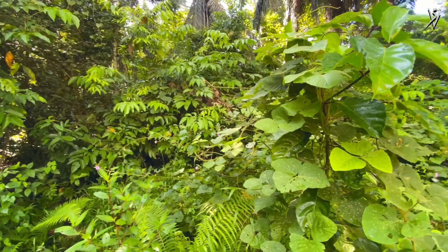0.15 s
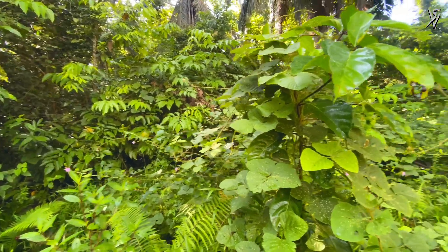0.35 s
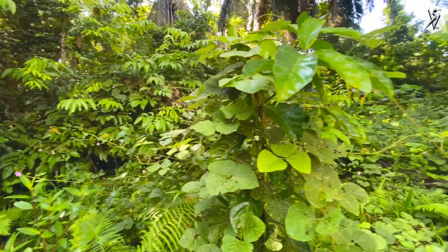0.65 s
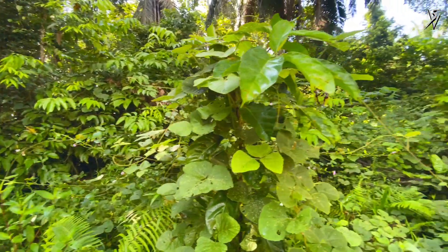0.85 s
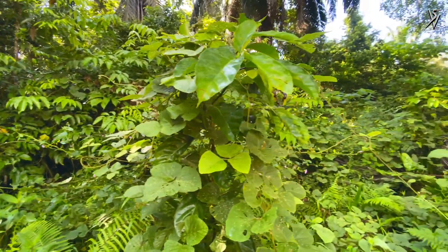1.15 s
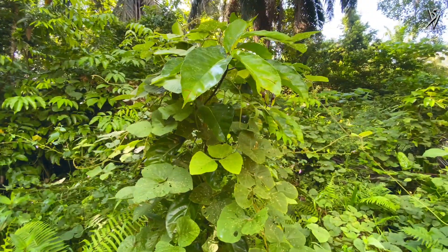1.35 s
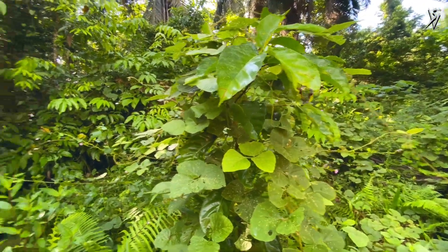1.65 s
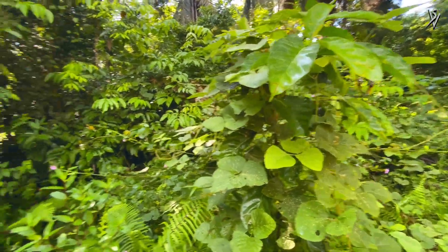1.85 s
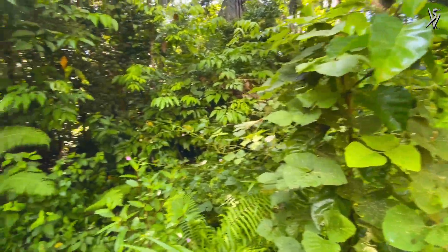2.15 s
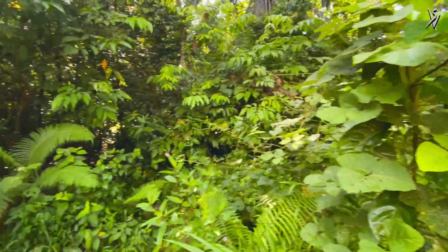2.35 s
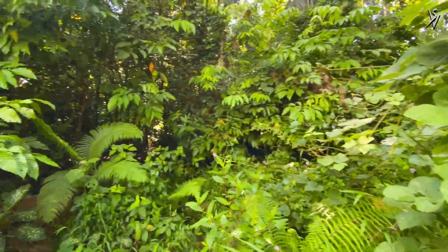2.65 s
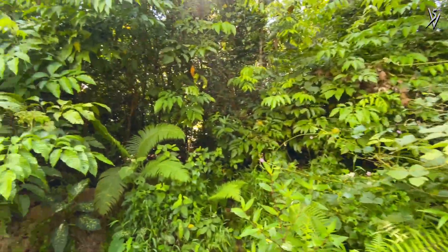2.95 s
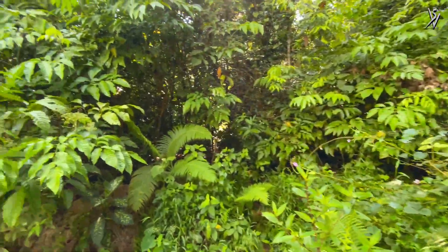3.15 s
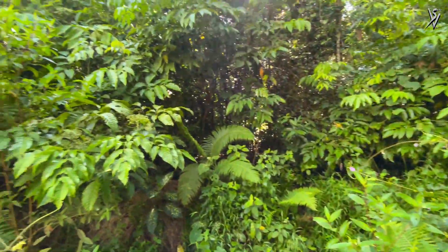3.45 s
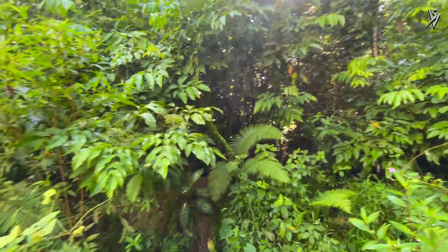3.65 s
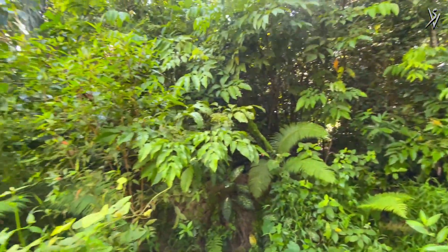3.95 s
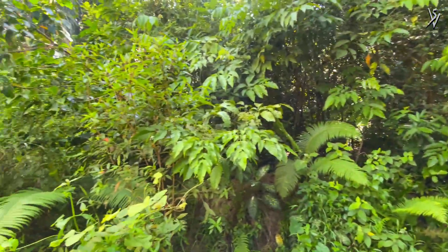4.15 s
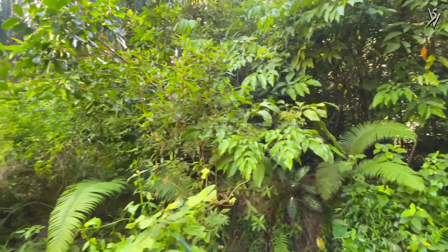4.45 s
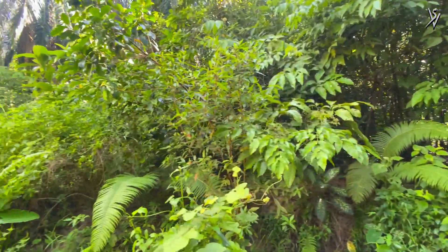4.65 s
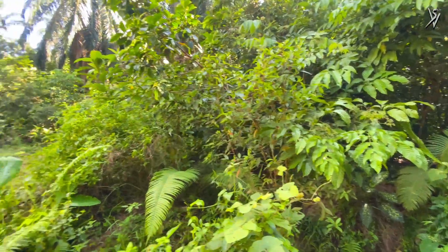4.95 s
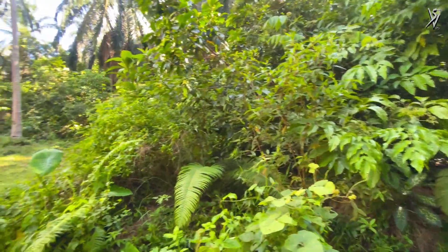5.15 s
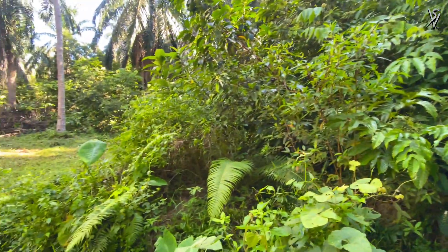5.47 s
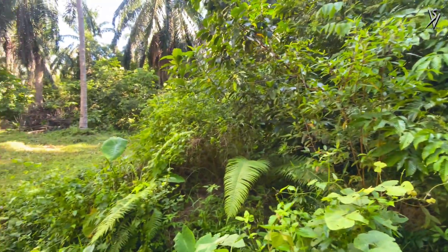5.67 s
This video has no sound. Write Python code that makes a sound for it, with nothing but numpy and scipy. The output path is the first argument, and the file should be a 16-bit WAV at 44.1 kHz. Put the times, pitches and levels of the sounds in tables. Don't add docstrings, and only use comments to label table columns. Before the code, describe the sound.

A steady, piercing insect chorus fills dense foliage throughout, in stereo from a handheld phone turning slowly. A near cricket at about 6.7 kHz chirps in tight triplets, some seventeen per second, so it reads as a rapid buzzing pulse; it starts softer, strengthens around 2.2 and 3.4 s, and keeps swelling and dipping and shifting sides. A further cricket trills higher during the first second, then in short phrases near 2.7, 3.3, 3.8, 4.9 and 5.6 s. Faint thin whistles around 3 kHz slide slowly down. Beneath lie low road rumble and distant engine hums near 50-60 Hz, wavering. The leaves are mostly calm until about 2.1 s, then rustle in light gusts, often from 3.2 s onward. Twigs tick faintly at 1.3 s, then more sharply at 2.4, 2.5, 3.8, 4.8, 5.0 and 5.6 s. A tiny bird slur drops quickly at 3.25 s.

```python
import sys
import numpy as np
from scipy import signal
from scipy.io import wavfile
from scipy.ndimage import uniform_filter1d

SR = 44100
rng = np.random.default_rng(int(sys.argv[2]) if len(sys.argv) > 2 else 0)


def pcm_store(signal):
    levels = np.round(np.clip(np.atleast_2d(signal), -1, 1) * 32767)
    wavfile.write(sys.argv[1], SR, levels.astype(np.int16).T)


def volts(x):
    e = np.asarray(x, float) / 20
    return 10 ** e


N = 256220
T = np.arange(N) / SR


def curve(table):
    s, *columns = np.transpose(table)
    return [np.interp(T, s, c) for c in columns]


def bumps(table):
    return sum(db * np.clip(1 - abs(T - s) / half_s, 0, 1) for s, half_s, db in table)


def phrases(table, fade_db_per_s):
    rise, fall = fade_db_per_s
    levels = []
    for start, end, db, *_ in table:
        levels.append(db - rise * np.maximum(start - T, 0) - fall * np.maximum(T - end, 0))
    return np.max(levels, axis=0)


def walk(rate, count=1):
    k = int(SR / rate)
    held = np.repeat(rng.standard_normal((count, N // k + 1)), k, 1)
    smooth = uniform_filter1d(uniform_filter1d(held, k), k)[:, :N]
    return smooth / smooth.std()


def pair(x, pan_db, turn=0.):
    left = (x * np.exp(.5j * turn)).real * volts(pan_db / 2)
    right = (x * np.exp(-.5j * turn)).real * volts(-pan_db / 2)
    return np.array([left, right])


def air(spectrum, flicker_db, grain_db=0.):
    grains = volts(grain_db * np.minimum(rng.exponential(size=N), 5))
    noise = rng.standard_normal((2, N)) * grains / np.sqrt(np.mean(grains ** 2))
    hz, _, z = signal.stft(noise, SR, nperseg=2048)
    f, mid_db, side_db, pan_db = np.transpose(spectrum)

    def colour(column, above_db):
        return np.interp(np.log(hz + 1), np.log(f), column, left=-150, right=above_db)[:, None]

    mid, side = volts(colour(mid_db, -150)), volts(colour(side_db, -150))
    pan = np.clip(colour(pan_db, 0), -6, 6)
    patch = rng.standard_normal(z.shape[1:])
    patch = uniform_filter1d(uniform_filter1d(patch, size=24, axis=0), size=4, axis=1)
    z = z * volts(flicker_db * patch / patch.std() + 10 * np.log10(SR / 2))
    m, s = z[0] * mid, z[1] * side
    both = np.array([(m + s) * volts(pan / 2), (m - s) * volts(-pan / 2)])
    return signal.istft(both, SR, nperseg=2048)[1][:, :N]


def strokes(times, hz, db, length_ms, glide, rise, scatter_db, detune):
    out = np.zeros(N + SR, complex)
    u = np.arange(int(length_ms * SR / 1000)) / SR
    share = u / u[-1]
    shape = np.sin(np.pi * share ** rise) ** 2
    for s, f, d, c in zip(times, hz, db, rng.standard_normal((len(times), 3))):
        phase = 2 * np.pi * f * (1 + detune * c[0]) * u * (1 + glide * (1 - share) / 2) + 10 * c[1]
        i = int(s * SR)
        out[i:i + len(u)] += volts(d + scatter_db * c[2]) * shape * np.exp(1j * phase)
    return out[:N]


def foliage(x, t60_s, wet_db, gap_ms):
    u = np.arange(SR // 2) / SR
    tail = rng.standard_normal((2, len(u))) * volts(-60 * u / t60_s) * (u > gap_ms / 1000)
    tail *= volts(wet_db) / np.sqrt(np.sum(tail ** 2, 1, keepdims=True))
    return x + signal.fftconvolve(x, tail, axes=1)[:, :N]


def octave_db():
    # centre_s, half_length_s, level_db
    beam = [(0, .16, -9), (2.1, .28, -7), (3.35, .22, -3), (4.6, 0.58, 9)]
    return -60 + 1.82 * T + bumps(beam)


def cricket():
    # time_s, lag_ms behind a steady beat
    chirp_lag = [(0.026, 26.3), (0.261, 27.2), (0.734, 33.0), (1.204, 35.2), (2.388, 51.5), (2.854, 50.3),
                 (3.321, 50.5), (3.791, 53.1), (4.494, 54.9), (4.958, 51.5), (5.712, 46.4)]
    # after_start_ms, level_db
    chirp_strokes = [
        (1.6, -5),
        (14.8, 0),
        (28.2, -0.9),
    ]
    # time_s, level_db
    right_port = [(0, -49), (.2, -47.5), (.6, -40.5), (.9, -47.5), (1.2, -41), (1.6, -42.5), (1.8, -45),
                  (2.2, -34.5), (2.6, -42.5), (3.4, -33.5), (3.8, -38), (4.0, -36), (4.2, -39.5),
                  (4.5, -36), (5.0, -35), (5.2, -40), (5.4, -37), (5.81, -40.5)]
    # centre_s, half_length_s, level_db
    shadows = [(.9, 0.24, -7), (1.4, 0.24, -14), (2.12, 0.48, -13), (4.24, 0.3, -9), (4.7, .26, -2.5),
               (5.2, 0.19, -6), (5.62, 0.24, 0.5)]
    s, lag_ms = np.transpose(chirp_lag)
    beat = np.arange(-1, 100) / 17.12
    starts = beat + np.interp(beat, s - lag_ms / 1000, lag_ms) / 1000
    ms, db = np.transpose(chirp_strokes)
    times = np.maximum(starts[:, None] + (ms - 4.8) / 1000, 0).ravel()
    wing = strokes(times, 6690 + 0 * times, np.tile(db, len(starts)), length_ms=10.45, glide=0.099,
                   rise=1.0, scatter_db=1.76, detune=0.0068)
    shake = np.exp(2j * walk(9.)[0])
    wing = wing + volts(-8.5) * np.roll(wing, int(4.7 * SR / 1000)) * shake
    right_db, pan_db = curve(right_port)[0], -1.6 + bumps(shadows)
    octave = wing ** 2 / (abs(wing) + 0.07)
    both = pair(wing * volts(right_db + pan_db / 2 + 7.5), pan_db, 0.77)
    both = both + pair(octave * volts(octave_db() + 8.0), 0, 0.76)
    return foliage(both, t60_s=.18, wet_db=-11., gap_ms=3.)


def fizz():
    # pitch_hz, mid_db_per_hz, side_db_per_hz, left_minus_right_db
    scrape = [(13500, -97, -100, -2), (14530, -91.5, -102, -11), (15100, -95, -96, -1),
              (15400, -94.5, -93, 0), (16000, -104, -94, 0)]
    return air(scrape, flicker_db=1.8) * volts(np.clip(.7 * (octave_db() + 52), -5, 1.5))


def trill():
    # start_s, end_s, level_db, from_hz, to_hz
    songs = [
        (0, 1.001, -57, 8300, 8480),
        (2.6, 2.92, -52.5, 8230, 8350),
        (3.18, 3.5, -54, 8450, 8310),
        (3.66, 3.95, -57, 8400, 8417),
        (4.9, 4.94, -59, 8820, 8740),
        (5.52, 5.81, -57, 8550, 8710),
    ]
    # time_s, lag_ms behind a steady beat
    trill_lag = [(0, 1.2), (1, 1.8), (2.5, 4.2), (3, 4), (3.2, .3), (3.6, 1), (3.8, -1.8), (5.5, -6),
                 (5.81, -3.5)]
    start, end, _, from_hz, to_hz = np.transpose(songs)
    hz = np.interp(T, np.ravel([start, end], "F"), np.ravel([from_hz, to_hz], "F"))
    db = phrases(songs, fade_db_per_s=(70, 110))
    beat = np.arange(1, 340) / 58.6
    times = beat + (np.interp(beat, *np.transpose(trill_lag)) - 5.) / 1000
    i = (times * SR).astype(int)
    song = strokes(times, hz[i], db[i] + 9.5, length_ms=15.0, glide=0.039, rise=1.0, scatter_db=1.9,
                   detune=0.0056)
    return foliage(pair(song, -1.4, 1.74), t60_s=0.21, wet_db=-3.0, gap_ms=3.)


def crowds(count=6):
    # wing_hz, spread_hz, strokes_per_s, level_db, swell_db_per_s
    species = [(3150, 80.4, 66, -65.5, -1.13), (4620, 170, 80, -59, 0.2), (6618, 170, 95, -44.5, 0.13),
               (8170, 404, 140, -51, 0.5), (10540, 420, 150, -44, 4.5), (12960, 395, 92, -60, -1)]
    # centre_s, half_length_s, level_db
    surges = [
        (1.3, 0.36, 1.6),
        (2.4, 0.42, -1.5),
        (3.2, .5, 0.2),
        (4.5, 0.32, -1),
        (5.4, 0.36, -1.8),
    ]
    out, drifts = 0, walk(2.2, count=count)
    for hz, spread_hz, rate, db, swell_db in species:
        crowd = 0
        for c, place, drift in zip(rng.standard_normal((count, 2)), rng.random((count, 2)), drifts):
            i = np.arange(place[0] * SR / rate, N, SR / (rate * (1 + .08 * c[0]))).astype(int)
            stroke_db = 1.03 * drift[i - int(hz)]
            song = strokes(T[i], 0 * i + hz, stroke_db, 1100 / rate, glide=0.028, rise=0.89,
                           scatter_db=1.04, detune=spread_hz / hz)
            crowd = crowd + pair(song, 5.9 * c[1] - 1.2, 1.87 * place[1])
        out = out + crowd / crowd.std() * volts(db + swell_db * (T - 7))
    return out * volts(bumps(surges))


def whistles():
    # start_s, end_s, from_hz, to_hz
    glides = [(0, 2.9, 3255, 3228), (.45, 1.05, 3102, 3090), (.2, 1, 3200, 3185), (1.2, 2.25, 3172, 3140),
              (2.3, 3.25, 3140, 3108), (2.52, 2.78, 3133, 3124), (2.78, 3.24, 3124, 3106),
              (1.3, 3.2, 3225, 3185), (3.35, 3.8, 3105, 3085), (3.4, 4.3, 3195, 3160),
              (4.3, 5.81, 3155, 3122), (4.25, 4.9, 3075, 3058)]
    glide_db = [-65.5, -60, -81, -60.5, -61, -55, -59, -70, -64, -63, -75, -67]
    out, wavers = 0, walk(18., count=len(glides))
    for (start, end, from_hz, to_hz), db, w, c in zip(glides, glide_db, wavers, rng.random((len(glides), 2))):
        fade = np.clip(np.minimum(T - start, end - T) / 0.17, 0, 1)
        hz = np.interp(T, [start, end], [from_hz, to_hz])
        turn = 2 * np.pi * np.cumsum(hz) / SR + 0.7 * w[::-1]
        tone = fade * volts(db + 4.0 + 3.2 * w) * np.exp(1j * turn)
        out = out + pair(tone, 6 * c[0] - 3, 1.07 + 1.1 * c[1])
    return out


def engines():
    # centre_s, half_length_s, level_db
    first_fades = [(.87, 0.36, -5), (1.45, 0.19, 2.5), (2.0, .35, -4), (2.613, 0.2, -19), (3.77, 0.32, 0),
                   (4.354, 0.38, -9), (5.81, 0.49, 0)]
    # centre_s, half_length_s, level_db
    second_fades = [(.95, 0.55, -13), (1.74, 0.28, -7), (2.9, 0.15, 0), (3.62, 0.4, -15.5), (4.8, 0.35, -8),
                    (5.81, 0.41, -11)]
    # centre_s, half_length_s, level_db
    other_fades = [(1.72, .35, -13), (2.03, 0.33, 5), (2.75, 0.37, 11), (4.2, 0.38, 7), (5.7, 0.33, 9)]
    first_db, second_db, other_db = -41 + bumps(first_fades), -41 + bumps(second_fades), -46 + bumps(other_fades)
    w = walk(7., count=3)
    firing_hz = 52.1 + .79 * T
    other_hz = 61.25 - 0.1856 * T + 0.459 * walk(3.)[0]
    turn = 2 * np.pi * np.cumsum(firing_hz) / SR
    other_turn = 2 * np.pi * np.cumsum(other_hz) / SR
    first = pair(volts(first_db - 1.5 + 0.6 * w[0]) * np.exp(1j * turn), -4.0, -0.4)
    second = pair(volts(second_db - .6 + 1.8 * w[1]) * np.exp(2j * turn + .3j * w[0]), -4.5, -0.16)
    other = pair(volts(other_db - 2.5 + 1.4 * w[2]) * np.exp(1j * other_turn), -16.0, -1.0)
    return first + second + other


def road():
    # pitch_hz, mid_db_per_hz, side_db_per_hz, left_minus_right_db
    rumble = [(22, -99, -101, 1), (40, -85, -69, 8), (55, -52.5, -59, -9), (79, -66, -63, 0.5),
              (119, -69, -62.5, -3), (191, -77, -72.5, 0.5), (443, -76, -72.5, 0), (827, -76, -70, -3),
              (1443, -81.5, -79.5, -2.5), (2485, -94.5, -94.5, 3), (3780, -105, -105, 25)]
    # centre_s, half_length_s, level_db
    traffic = [
        (0, 0.2, -3.5),
        (.93, 0.057, 2),
        (2.52, 0.066, -4.5),
        (3.7, 0.26, -2.4),
        (5.1, 0.22, 0.7),
    ]
    level_db = 0.49 * (T - T.mean()) + bumps(traffic) + 0.44 * walk(25.08)[0]
    return air(rumble, flicker_db=1.9) * volts(level_db)


def gust_stir_db():
    # start_s, end_s, stir_db
    gusts = [(0, .03, -58.5), (.9, .94, -67), (1.79, 1.93, -63), (2.12, 2.2, -51), (2.35, 2.47, -51.5),
             (2.65, 2.72, -65), (3.24, 3.42, -52.5), (3.55, 3.78, -53), (3.8, 3.82, -51), (4.0, 4.18, -57),
             (4.3, 4.43, -54.5), (4.78, 4.97, -52.5), (5.04, 5.05, -54), (5.1, 5.2, -55), (5.25, 5.27, -52),
             (5.6, 5.64, -55.5), (5.75, 5.81, -54.5)]
    return np.maximum(phrases(gusts, fade_db_per_s=(47, 62)), -72)


def canopy(stir_db):
    # pitch_hz, mid_db_per_hz, side_db_per_hz, left_minus_right_db
    hiss = [(1570, -110, -110, -20), (2725, -95, -90, 3.5), (4054, -93.5, -93, 2.5), (5400, -97.5, -92, 20),
            (6360, -83, -100, 12), (7000, -88.5, -80, -3.5), (9040, -87, -86.5, -5.5),
            (10300, -88, -101, 4), (11030, -90.5, -90, -11), (11780, -110, -87.5, 1),
            (12750, -91.5, -83, 2), (13500, -89.5, -90, 0), (14300, -96, -100, 2), (15760, -103, -96, 3)]
    lift_db = np.clip(0.1 * (uniform_filter1d(stir_db, SR // 4) + 52.5), -1.1, .1)
    return air(hiss, flicker_db=.8) * volts(lift_db + 0.26 * (T - T.mean()))


def leaves(stir_db):
    # pitch_hz, mid_db_per_hz, side_db_per_hz, left_minus_right_db
    brushing = [(696, -18, -25, 2), (1440, 9, -3, -1), (2450, 0, -1, -3), (4030, -6.5, -10, -0.5),
                (5700, -2, -9, 18), (11000, -24, -15, -15)]
    rustle = air(brushing, flicker_db=1.9, grain_db=4.1)
    return rustle / rustle.std() * volts(-64 + 1.8 * (stir_db + 59.5))


def twigs():
    # start_s, peak_db, ring_hz, left_minus_right_db
    ticks = [
        (1.257, -45, 3340, -1.5),
        (2.371, -30.5, 1680, -1.5),
        (2.456, -35, 1628, -10),
        (3.7913, -35.5, 1853, -1.5),
        (4.7972, -29.5, 1230, -4),
        (5.0402, -28.5, 1890, -2.0),
        (5.5892, -34, 1430, 2),
    ]
    out = np.zeros((2, N))
    u = np.arange(SR // 50) / SR
    for (s, db, hz, pan_db), noise in zip(ticks, rng.standard_normal((len(ticks), len(u)))):
        ring = np.exp(2j * np.pi * hz * u - u / 0.0017)
        crack = 0.27 * noise * np.exp(-u / .0009)
        i = int(s * SR)
        out[:, i:i + len(u)] += pair(volts(db) * (ring + crack), pan_db, 1.27)
    return out


def bird():
    # time_s, pitch_hz, level_db
    slur = [
        (3.228, 4300, -68),
        (3.24, 4070, -56),
        (3.256, 3780, -46),
        (3.275, 3600, -48.5),
        (3.295, 3460, -55),
        (3.315, 3350, -60),
        (3.37, 3266, -64),
    ]
    hz, db = curve(slur)
    on = (T > slur[0][0]) & (T < slur[-1][0])
    tone = on * volts(db + 5.5 + 1.6 * walk(120.)[0]) * np.exp(2j * np.pi * np.cumsum(hz) / SR)
    return foliage(pair(tone, 1.37, 1.2), t60_s=.4, wet_db=-9., gap_ms=8.)


def scene():
    stir_db = gust_stir_db()
    insects = cricket() + fizz() + trill() + crowds() + whistles()
    distance = engines() + road() + canopy(stir_db)
    return insects + distance + leaves(stir_db) + twigs() + bird()


def top_cut(x):
    return signal.sosfilt(signal.butter(12, 15760, fs=SR, output="sos"), x)


def record(dry):
    # pitch_hz, mid_db_per_hz, side_db_per_hz
    starve = [(2210, -99, -99), (2650, -95.5, -91), (3818, -95.5, -97), (5540, -96, -98), (7300, -100, -95),
              (9500, -96, -99), (9965, -92.5, -93), (10900, -98, -98), (11560, -82, -92), (12060, -80, -94),
              (12570, -92.5, -90), (13500, -93.5, -98), (13800, -89, -82), (14570, -89.5, -88),
              (15200, -89, -92), (15800, -78, -90)]
    left, right = dry
    hz, _, z = signal.stft(np.array([left + right, left - right]) / 2, SR, nperseg=2048)
    edges = np.r_[0:320:8, 320:1025:16]
    width = np.diff(np.r_[edges, len(hz)])
    power = np.add.reduceat(abs(z) ** 2, edges, axis=1) / width[:, None]
    level_db = 10 * np.log10(uniform_filter1d(power, 2) * 2048 / 1.5 / (SR / 2) + 1e-20)
    f, *limits = np.transpose(starve)
    limit_db = np.array([np.interp(hz[edges + width // 2], f, c, left=-200) for c in limits])
    scatter_db = 2.36 * rng.standard_normal(power.shape)
    heard = level_db > limit_db[:, :, None] + scatter_db
    z = z * np.repeat(heard, width, axis=1)
    mid, side = signal.istft(z, SR, nperseg=2048)[1][:, :N]
    return top_cut(np.array([mid + side, mid - side]))


dry = scene()
out = record(dry)
pcm_store(out)
```